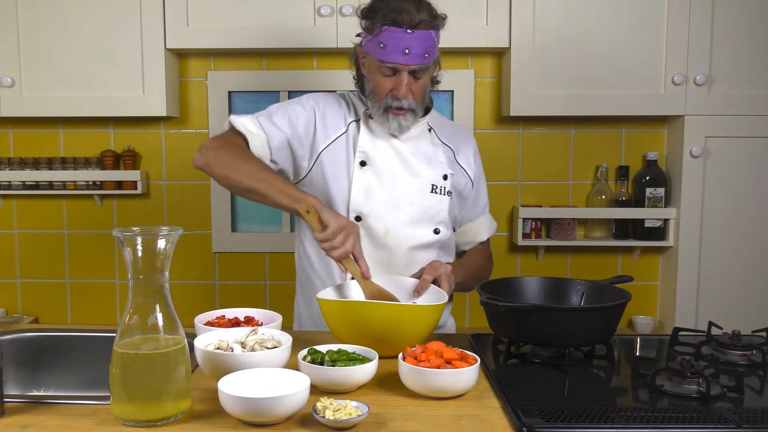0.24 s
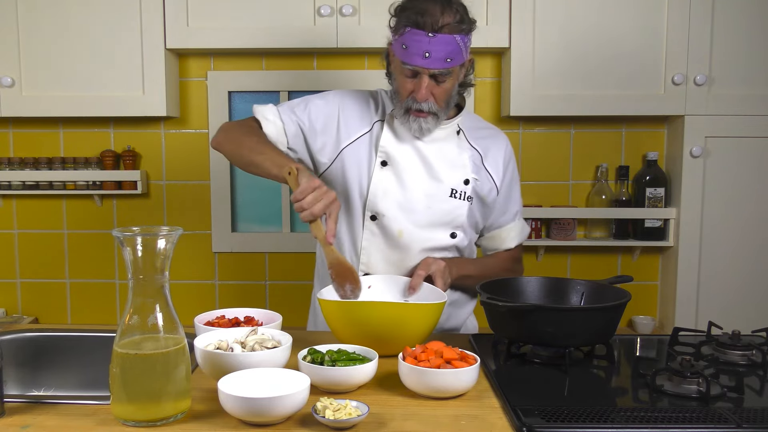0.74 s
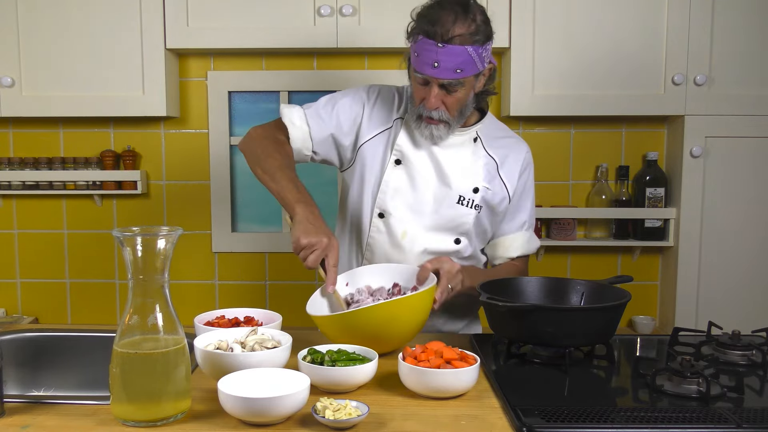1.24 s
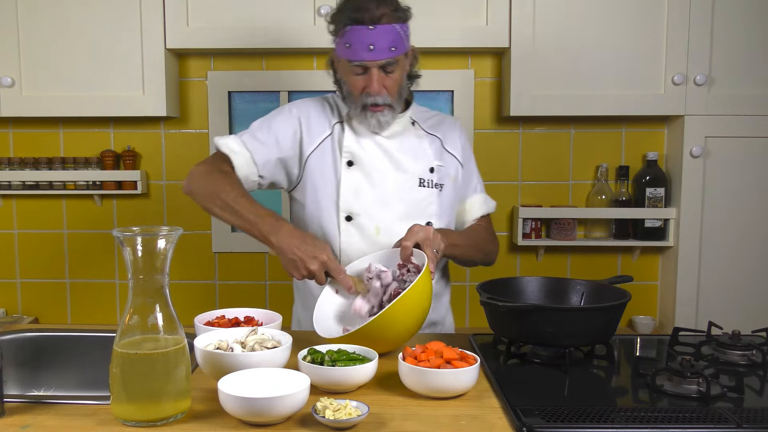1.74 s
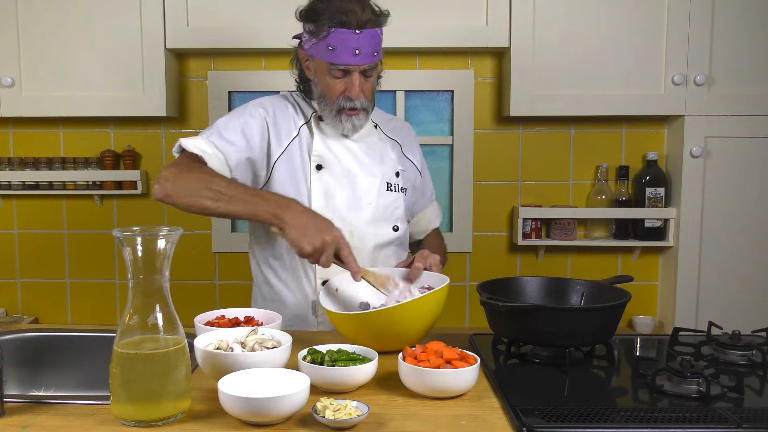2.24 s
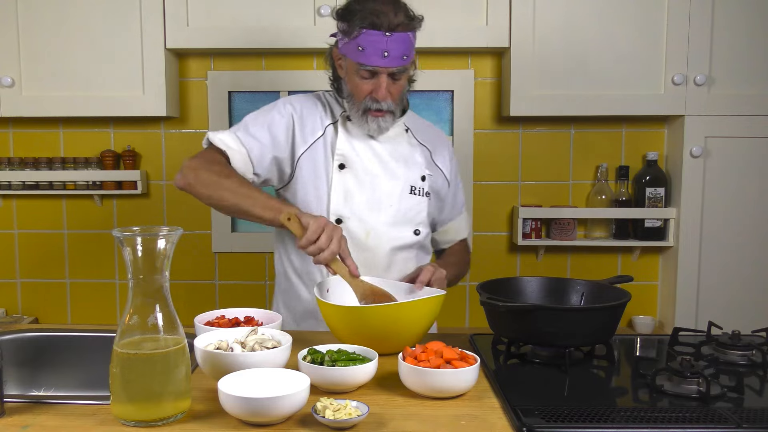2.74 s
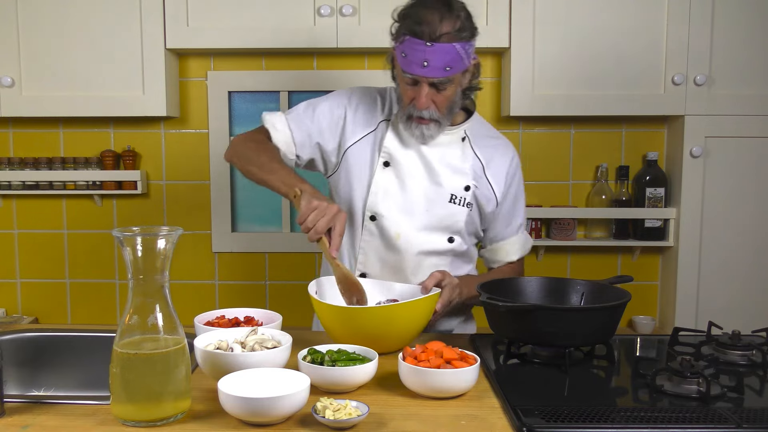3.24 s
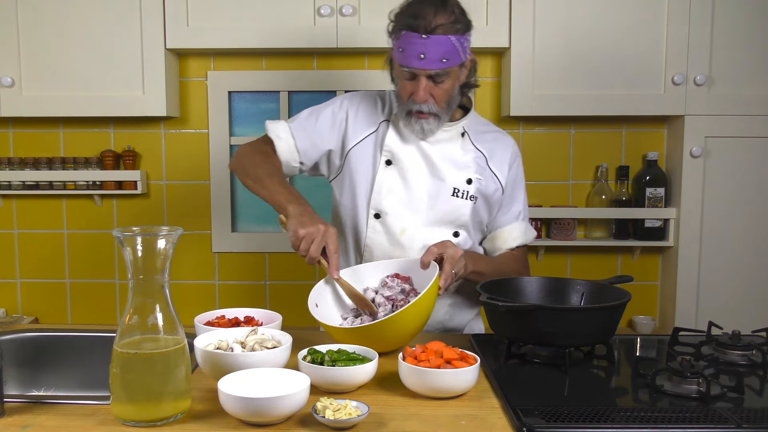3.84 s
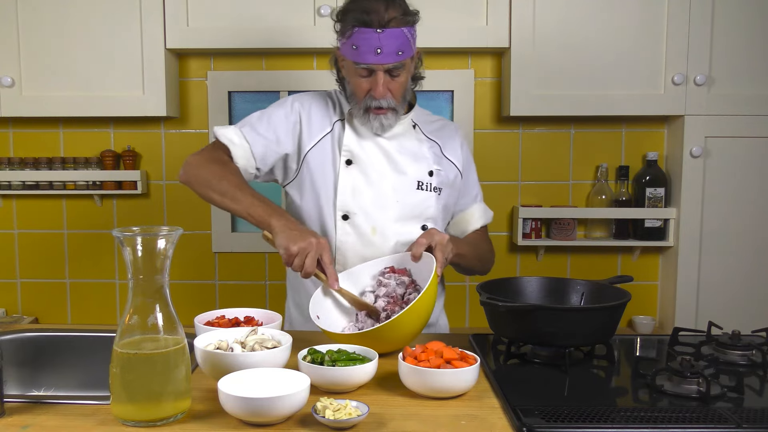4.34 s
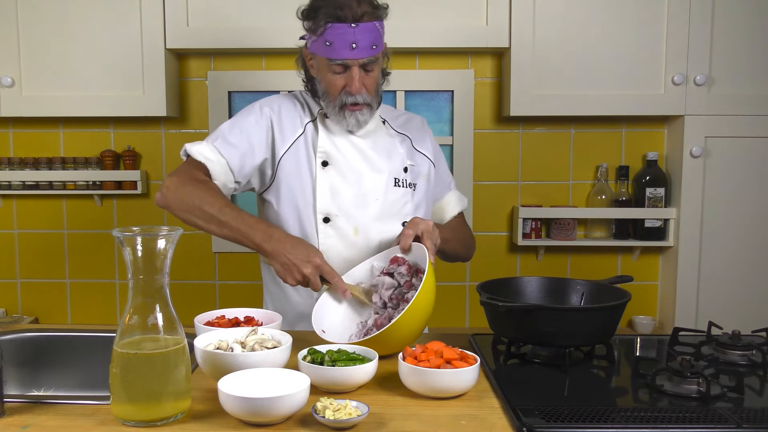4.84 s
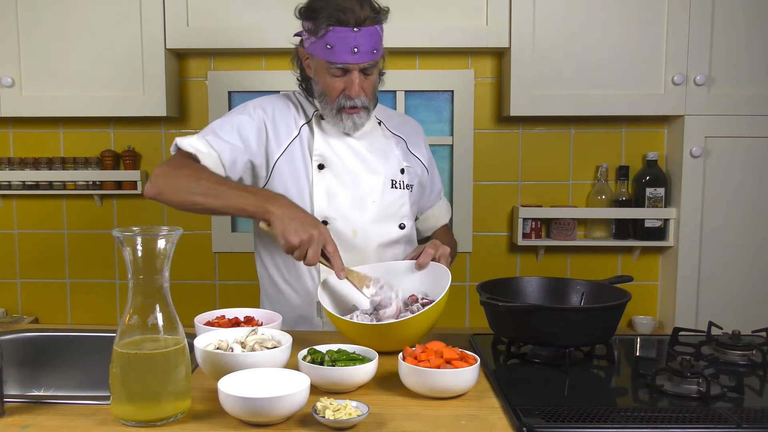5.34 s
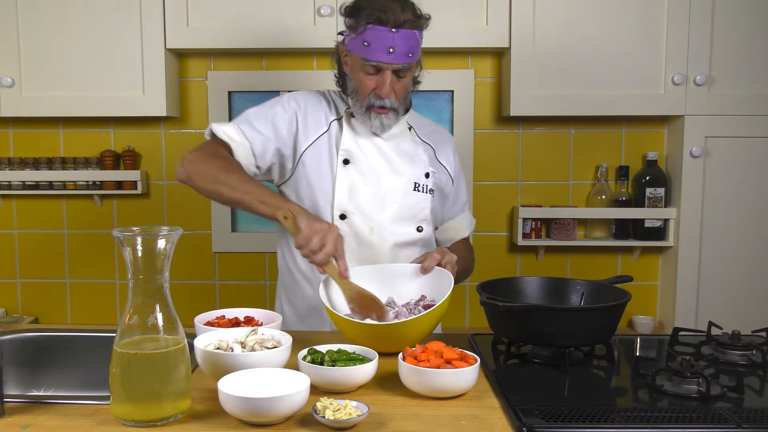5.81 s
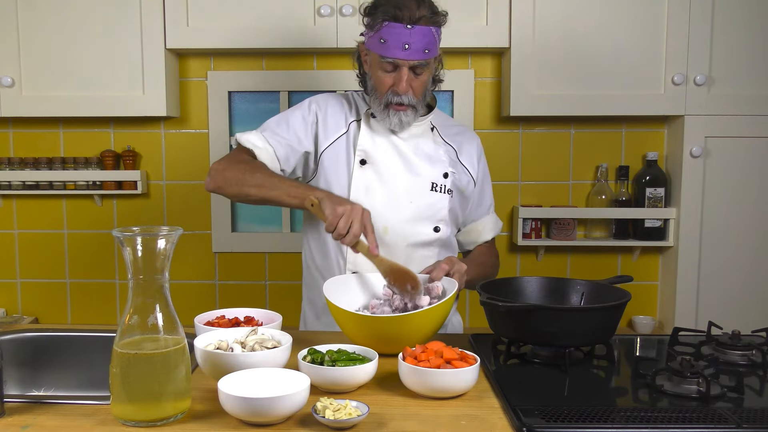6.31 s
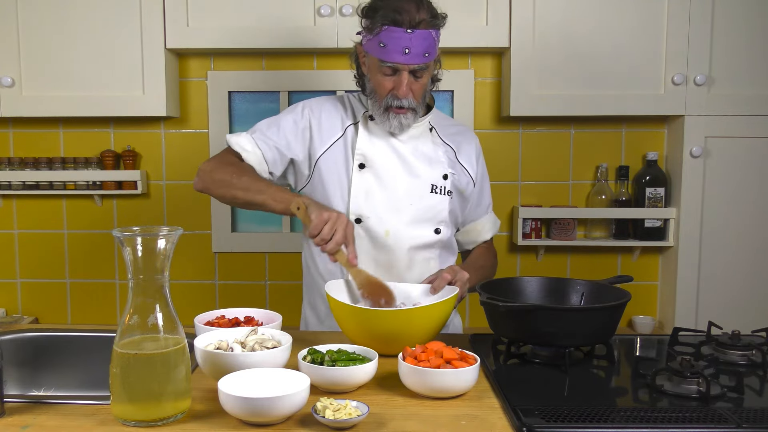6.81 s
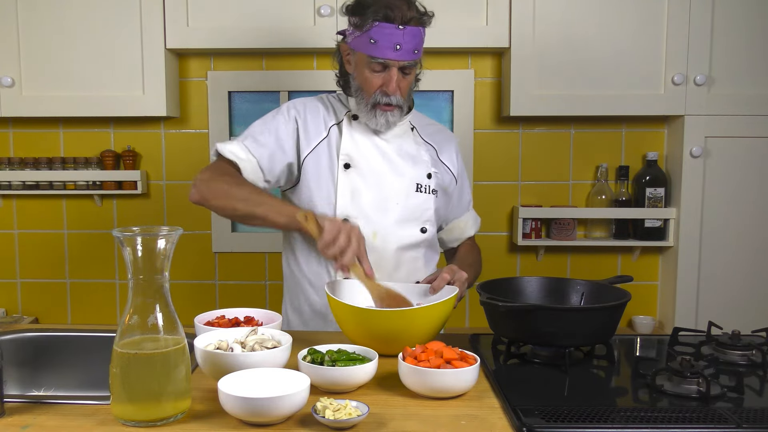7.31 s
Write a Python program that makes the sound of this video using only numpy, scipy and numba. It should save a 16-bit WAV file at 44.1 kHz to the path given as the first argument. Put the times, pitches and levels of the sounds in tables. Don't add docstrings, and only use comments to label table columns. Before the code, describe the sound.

A wooden spoon works floured meat cubes in a plastic bowl, heard close and centred in a small tiled kitchen with a faint steady appliance hum. Hollow knocks at 0.1 and 0.2 seconds come with floury brushing, then a softer thump near 0.55 and an edgy tick at 0.8. From 0.9 to 1.9 a long gritty scrape swells and brightens along the wall, with small taps. Light taps and muffled thumps cluster around 2.4 to 2.6. Two hard blows land at 3.2, sharper clacks at 3.7 and 4.2 with bursts of hiss. A shorter jerky scrape runs 4.4 to 5.2, with a wet slip near 5.05. Faint floury rustles and slithers follow until about 6.4, then a run of dull bumps from 6.5 to 6.7. Quiet brushing leads to light taps at 7.3 and 7.4 and a full hollow knock at 7.5.

```python
import sys
import numpy as np
from scipy import signal
from scipy.fft import rfft, irfft, next_fast_len
from scipy.io import wavfile
from scipy.ndimage import uniform_filter1d
from numba import njit

SR = 44100
rng = np.random.default_rng(int(sys.argv[2]) if len(sys.argv) > 2 else 0)


def field_ratio(decibels):
    return 10 ** (np.asarray(decibels, dtype=float) / 20)


def waveform_to_disk(signal):
    frames = np.transpose(np.atleast_2d(signal))
    scaled = np.clip(frames, -1, 1) * 32767
    samples = np.round(scaled).astype(np.int16)
    wavfile.write(sys.argv[1], SR, samples)


N = 333837

# (frequency [Hz], level [dB], t60 [s])
BODY_MODES = [(240, -16, 0.088), (247.7, -10.5, 0.36), (296.6, -9.5, 0.14), (343, -9, 0.27),
              (392.4, -10.5, 0.3), (420, -4.5, 0.1), (468.5, -1.5, 0.086), (526.6, 0.5, 0.065)]
WALL_MODES = [(740, -44.5, .04), (770, 3.5, 0.045), (744, -22.5, 0.0082), (1042, -3.5, 0.042),
              (1040, 4, 0.082), (1235, 18, 0.04), (1480, 0, 0.04)]
EDGE_MODES = [(1500, -8.5, 0.015), (1617, -6.5, 0.011), (1800, 5, 0.04), (1995, 12.5, 0.019),
              (2126, -2.5, 0.033), (2237, 10.5, 0.031), (2840, 3.5, 0.019)]


def level(x, db):
    return x * field_ratio(db) / np.sqrt(np.mean(x ** 2))


def colour(x, table):
    hz, db = np.transpose(table)
    size = next_fast_len(len(x))
    bins_hz = np.maximum(np.arange(size // 2 + 1) * SR / size, 1)
    gain = field_ratio(np.interp(np.log(bins_hz), np.log(hz), db))
    return irfft(rfft(x, size) * gain, size)[:len(x)]


@njit
def svf(x, hz, width_hz):
    y, band, low = np.empty(len(x)), 0., 0.
    for i in range(len(x)):
        g, k = np.tan(np.pi * hz[i] / SR), width_hz / hz[i]
        v = (band + g * (x[i] - low)) / (1 + g * (g + k))
        band, low, y[i] = 2 * v - band, low + 2 * g * v, k * v
    return y


def resonate(x, hz, width_hz):
    return svf(x, np.full(len(x), 1. * hz), 1. * width_hz)


def walk(rate_hz):
    hold = int(SR / rate_hz)
    steps = np.repeat(rng.standard_normal(N // hold + 1), hold)
    return 0.52 * uniform_filter1d(steps, hold)[:N]


def hum():
    # (frequency [Hz], level [dB])
    air_spectrum = [(25, -24), (65, -7), (169, 0), (380, -10), (580, -25.5), (1150, -18), (2050, -18.5),
                    (3360, -32)]
    # (frequency [Hz], level [dB])
    motor_tones = [(172.3, -81.5), (360.7, -73), (1890, -92.5), (1951, -72.5), (2009, -89)]
    t = np.arange(N) / SR
    air = level(colour(rng.standard_normal(N), air_spectrum), -57) * field_ratio(.6 * walk(2.7))
    motors = sum(field_ratio(db + 1.5 * walk(5)) * np.sin(2 * np.pi * hz * t) for hz, db in motor_tones)
    return air + motors


def echoes():
    # (band centre [Hz], t60 [s], level [dB])
    room_bands = [(200, 0.39, -14), (482, 0.089, -4), (984, 0.26, -0.5), (2240, 0.31, -11.5),
                  (4500, 0.088, -5), (8840, .22, -16)]
    soonest_s = .005
    t = np.arange(int(.5 * SR)) / SR
    tail = 0
    for hz, t60_s, db in room_bands:
        noise = level(resonate(rng.standard_normal(len(t)), hz, 1.32 * hz), db)
        tail = tail + noise * 1000. ** (-t / t60_s) / np.sqrt(t60_s)
    spectrum = rfft(tail * (1 - np.exp(-(t / soonest_s) ** 2)))
    power = np.abs(spectrum) ** 2
    near, wide = uniform_filter1d(power, size=30), uniform_filter1d(power, size=300)
    even = irfft(spectrum * np.sqrt(wide / near), len(t))
    return even * field_ratio(-43.0) * np.cos(np.pi * t / t[-1] / 2) ** 2


def slides():
    # (start [s], length [s], centre [Hz], width [Hz], level [dB])
    rubs = [(0.074, 0.087, 2490, 700, -49.5), (0.405, 0.054, 2640, 600, -53),
            (2.374, 0.013, 1800, 300, -54.5), (2.808, 0.091, 6030, 1200, -64),
            (3.468, 0.16, 3770, 402, -63.5), (5.057, 0.046, 3500, 1600, -40.5),
            (5.523, .11, 1960, 906, -56.5), (5.55, 0.063, 6800, 1500, -62), (5.656, 0.11, 5840, 907, -62.5),
            (5.655, 0.092, 7200, 700, -64), (5.74, .14, 4500, 300, -70.5), (6.24, 0.17, 8850, 600, -63),
            (7.248, 0.03, 5500, 2000, -68), (1.718, .08, 1055, 150, -56.5), (6.249, 0.059, 530, 200, -58.5)]
    out = np.zeros(N)
    for start_s, length_s, hz, width_hz, db in rubs:
        phase = np.arange(int(length_s * SR)) / (length_s * SR)
        rub = resonate(rng.standard_normal(len(phase)), hz, width_hz)
        rub = resonate(rub, hz, width_hz)
        start = int(start_s * SR)
        out[start:start + len(phase)] += level(rub, db) * np.sin(np.pi * np.sqrt(phase))
    return out


def grit(spread_db, flicker_db, rate_hz):
    size = np.minimum(rng.exponential(size=N), 6.5)
    return rng.standard_normal(N) * field_ratio(spread_db * size + flicker_db * walk(rate_hz))


def motion():
    # (loudest [s], rise [s], fall [s], fine flour [dB], coarse grain [dB])
    brushes = [(0.182, 0.092, .08, -41.5, -43), (0.269, .04, .2, -73.5, -41),
               (.42, 0.019, .12, -55.5, -56.5), (0.508, 0.046, .3, -56.5, -44.5),
               (.78, 0.18, .11, -46.5, -48.5), (2.421, 0.19, .11, -50.5, -57),
               (2.679, 0.091, .16, -52.5, -62.5), (2.83, 0.15, .08, -58.5, -89),
               (3.06, 0.16, .1, -50.5, -63.5), (3.201, 0.058, .2, -54, -45.5), (3.5, 0.35, .3, -64.5, -64),
               (3.731, 0.025, .17, -47, -43.5), (4.178, 0.022, 0.12, -37, -39),
               (4.25, 0.095, 0.053, -41, -62), (5.27, 0.036, .22, -52, -80), (5.6, 0.89, .3, -63, -69.5),
               (5.901, .15, .13, -55.5, -56), (6.142, 0.032, .15, -46.5, -45.5),
               (6.3, 0.88, .18, -62.5, -80), (6.51, 0.13, .3, -62.5, -54), (6.768, 0.26, .2, -65.5, -67),
               (7.422, 0.11, .15, -62, -47), (7.53, 0.025, .1, -49, -40)]
    # (time [s], speed [dB], pressure [dB], contact resonance [Hz])
    strokes = [
        [(.88, -58, -64.5, 2200), (.95, -51.5, -48, 2200), (1.14, -50, -36.5, 1800), (1.27, -42.5, -34, 1650),
         (1.39, -55.5, -41, 1900), (1.53, -54, -38, 1950), (1.66, -55, -45.5, 2250), (1.87, -50.5, -45, 2600),
         (1.97, -73.5, -80, 2430)],
        [(4.36, -71, -69, 1600), (4.415, -53, -45, 1550), (4.47, -64, -53, 1550), (4.5, -50, -32.5, 1500),
         (4.58, -54, -39.5, 1550), (4.68, -58, -43, 1700), (4.83, -50, -38, 1950), (5.07, -51, -50.5, 2550),
         (5.2, -72, -67, 2500)],
    ]
    fade_db = 23.5
    rest_db = -84.5
    t = np.arange(N) / SR
    fine, coarse = np.full(N, rest_db), np.full(N, rest_db - 8.0)
    for peak_s, rise_s, fall_s, fine_db, coarse_db in brushes:
        fade = fade_db * np.maximum((peak_s - t) / rise_s, (t - peak_s) / fall_s)
        fine = np.maximum(fine, fine_db - fade)
        coarse = np.maximum(coarse, coarse_db - fade)
    speed, pressure, contact_hz = np.full(N, -120.), np.full(N, -120.), np.full(N, 1500.)
    for stroke in strokes:
        s, *columns = np.transpose(stroke)
        on = (t >= s[0]) & (t <= s[-1])
        speed[on], pressure[on], contact_hz[on] = (np.interp(t[on], s, c) for c in columns)
    hiss_db = np.maximum(fine, speed + 5.5)
    scrape_db = np.maximum(coarse + 0.5, pressure - 3.5)
    rock_db = pressure - 8
    return hiss_db, scrape_db, contact_hz, rock_db, np.maximum(coarse, pressure - 8.5)


def rubbing():
    # (frequency [Hz], level [dB per Hz])
    flour = [(1590, -20.5), (2700, 0), (3730, -7.5), (4320, -3), (6470, -5), (10900, -5.5), (13900, -18),
             (15600, -29)]
    # (frequency [Hz], level [dB])
    sheen_modes = [(3600, 5), (3850, 2), (4250, -4.5), (4600, -7), (5050, -5.5), (5650, -1.5), (6200, -1),
                   (6900, -6.5), (7500, -1), (8100, -2.5), (8900, -0.5), (9800, -5), (10900, -3)]
    hiss_db, scrape_db, contact_hz, rock_db, coarse_db = motion()
    scrape_db = np.minimum(scrape_db, hiss_db + 11)

    grains = colour(grit(1.8, 5, 40), flour)
    sheen = sum(field_ratio(db + 13 * walk(9)) * resonate(grains, hz, 130) for hz, db in sheen_modes)
    grains = level(grains, -1) * np.clip((hiss_db + 94.0) / 30, .3, 1) + level(sheen, -6.5)
    fine = colour(grains, [(5500, -17.5), (7500, -11.0)])
    coarse = colour(grains, [(5500, -16.5), (8000, -30.5)])
    hiss = level(fine, -1.7) * field_ratio(hiss_db) + level(coarse, -3.1) * field_ratio(coarse_db)

    contact = svf(grit(4.05, 5.1, 70), 0.81 * contact_hz, 1950.0)
    contact = svf(contact, contact_hz, 1200.0)
    for share in (.62, .4):
        contact = contact - svf(contact, share * contact_hz, 630.0)
    lines = sum(field_ratio(db + 1.3 * walk(4.5)) * resonate(contact, hz, 120)
                for hz, db, _ in WALL_MODES[3:] + EDGE_MODES)
    scrape = (level(contact, -1.6) + level(lines, -11)) * field_ratio(scrape_db)

    bumps = grit(2.3, 2.1, 50)
    rock = sum(field_ratio(db) * resonate(bumps, hz, 88) for hz, db, _ in BODY_MODES[4:] + WALL_MODES[:1])
    return hiss + scrape + level(rock, -11) * field_ratio(rock_db)


def group(modes, t):
    hz, db, t60_s = np.transpose(modes)[:, :, None]
    band = signal.butter(3, [.85 * hz.min(), 1.15 * hz.max()], "bandpass", fs=SR, output="sos")
    rings = field_ratio(db) * np.sin(2 * np.pi * hz * t) * 1000. ** (-t / t60_s)
    return hz[:, 0], signal.sosfilt(band, rings), band


def ring(shares_db, rings, band, t, crack_db, crack_s):
    y = field_ratio(shares_db) @ rings
    push = rng.standard_normal(len(t)) * np.exp(-t / crack_s)
    push[0] += field_ratio(27)
    crack = signal.sosfilt(band, push)
    y = y / np.abs(y).max() + field_ratio(crack_db) * crack / np.abs(crack).max()
    return y / np.abs(y).max()


def knocks():
    # (frequency [Hz], level [dB], t60 [s])
    tick_modes = [(3050, 18.5, 0.011), (3500, -17.5, 0.0095), (4380, 28.5, 0.0065), (4830, -25, 0.0027),
                  (5800, -14, 0.002)]
    # (time [s], body level [dB], body pitch [Hz], wall [dB], edge [dB])
    thuds = [(0.237, -4.5, 420, -3.5, -3), (0.536, -11.5, 382, 0.5, 0), (0.579, -28, 316, -29, -15),
             (0.889, -23, 472, 4, 6.5), (2.512, -20, 324, -0.5, -16.5), (2.526, -23.5, 416, -27, -10),
             (2.603, -19.5, 420, -1.5, -13), (2.63, -25.5, 446, 1.5, -10), (2.616, -16.5, 402, -16, -8.5),
             (5.884, -60.5, 331, -10, 28), (6.292, -54.5, 543, 14, 16), (6.473, -21, 383, -5, -10),
             (6.518, -12, 385, -10.5, -11.5), (6.532, -14, 420, -10.5, -29), (6.557, -22.5, 320, -27, -16),
             (6.61, -20, 362, 0.5, -5.5), (6.652, -24.5, 320, -20, -20), (6.685, -28.5, 330, -33, -21),
             (6.714, -33, 325, -30, -19)]
    # (time [s], body level [dB], body pitch [Hz], edge [dB], tick [dB])
    taps = [(0.079, -45.5, 264, 5, 8), (0.411, -32.5, 430, -9, -2), (0.499, -39.5, 350, -5, 7.5),
            (1.22, -31.5, 500, 15, 10.5), (1.741, -34, 545, -0.5, 6), (2.352, -35, 495, -12, -8),
            (2.388, -38.5, 483, -21, -4), (3.155, -41.5, 366, 4, -6), (4.397, -46, 248, -1, -14),
            (4.643, -36, 545, 17, 4.5), (5.154, -34.5, 438, -16, -23), (7.328, -31.5, 466, -18, -23),
            (7.397, -46, 480, -16, 15.5)]
    # (time [s], body level [dB], body pitch [Hz], wall [dB], edge [dB])
    bangs = [
        (0.125, -11.5, 420, 2, 0),
        (0.765, -40, 584, -4, 26.5),
        (3.188, -7, 437, -3, 1),
        (3.222, -8.5, 461.5, -1, -2),
        (3.727, -23.5, 483, 1.5, 11.5),
        (4.170, -27.5, 406, 3, 13.5),
        (7.521, -8.5, 420, 1.5, 4.5),
    ]
    delay_s = 0.001158
    grip_detune, spot_law = 0.0219, .45
    swell_cycles = 0.32
    # share scatter [dB], crack [dB], crack length [s], favour of struck spot [dB per octave]
    manners = ((2.5, -14, 0.04, 30.0), (2.5, 6.5, 0.015, 12.0),
               (2.5, 1, 0.017, -12.0), (2.5, 2.0, 0.017, -9))

    out, t = np.zeros(N + SR), np.arange(int(.3 * SR)) / SR
    groups = [group(modes, t) for modes in (BODY_MODES, WALL_MODES, EDGE_MODES, tick_modes)]
    blows = [(s, db, hz, wall, edge, edge - 18.5) for s, db, hz, wall, edge in thuds]
    blows += [(s, db, hz, edge - 8, edge, tick) for s, db, hz, edge, tick in taps]
    blows += [(s, db, hz, wall, edge, edge - 8) for s, db, hz, wall, edge in bangs]
    for s, body_db, spot_hz, *parts_db in blows:
        start = int((s + delay_s) * SR)
        for (hz, rings, band), db, manner in zip(groups, [0] + parts_db, manners):
            scatter_db, crack_db, crack_s, favour = manner
            shares_db = scatter_db * rng.standard_normal(len(hz))
            shares_db = shares_db - favour * np.abs(np.log2(hz / spot_hz))
            tune = 1 + grip_detune * rng.standard_normal()
            if favour < 0:
                tune *= (spot_hz / 430) ** spot_law
            blow = np.interp(t * tune, t, ring(shares_db, rings, band, t, crack_db, crack_s))
            swell = 1 - np.exp(-t * hz.min() / swell_cycles)
            out[start:start + len(t)] += field_ratio(body_db + db) * blow * swell
    return out[:N]


def scene():
    # (frequency [Hz], side level [dB])
    side_spectrum = [(60, -7.5), (200, -10), (500, -12.5), (1200, -7.5), (2500, -4.5), (5000, -7.5),
                     (9000, -36), (13000, -0.5)]
    pan_db = .5
    bowl = knocks() + rubbing() + slides()
    mid = bowl + signal.fftconvolve(bowl, echoes())[:N] + hum()
    side = field_ratio(1.5) * signal.fftconvolve(bowl, echoes())[:N] + hum()
    side = colour(side, side_spectrum)
    return np.array([mid + side, mid - side]) * field_ratio(np.array([[pan_db], [-pan_db]]) / 2)


def roll_off(x):
    return signal.sosfilt(signal.butter(12, 15760, fs=SR, output="sos"), x)


def record(dry):
    top = signal.ellip(8, .2, 70, 15700, fs=SR, output="sos")
    mix = signal.sosfilt(top, dry)
    return roll_off(mix)


dry = scene()
out = record(dry)
waveform_to_disk(out)
```